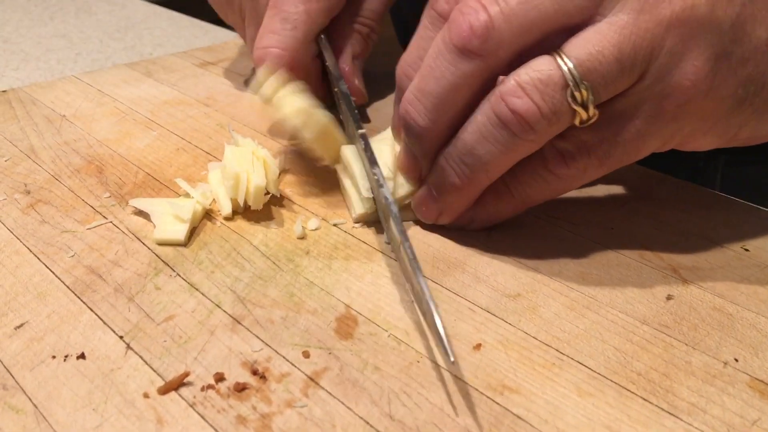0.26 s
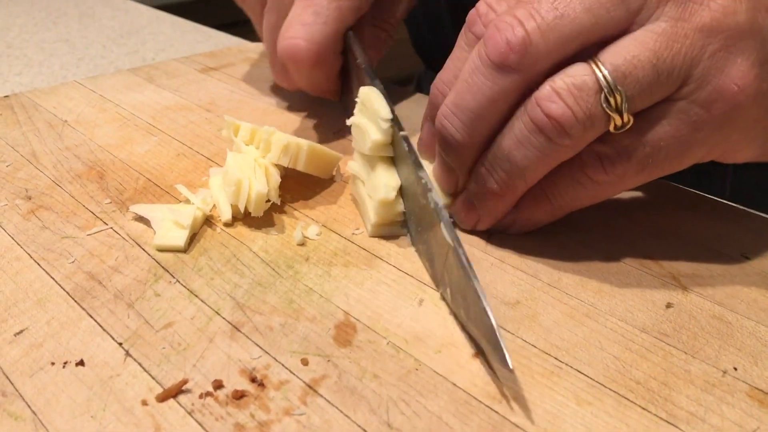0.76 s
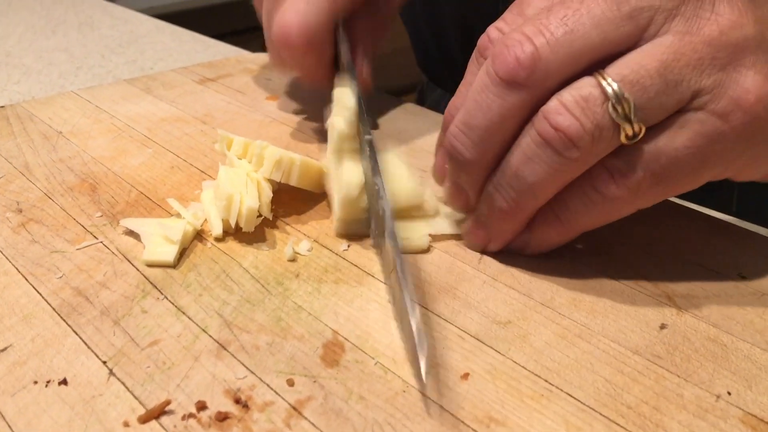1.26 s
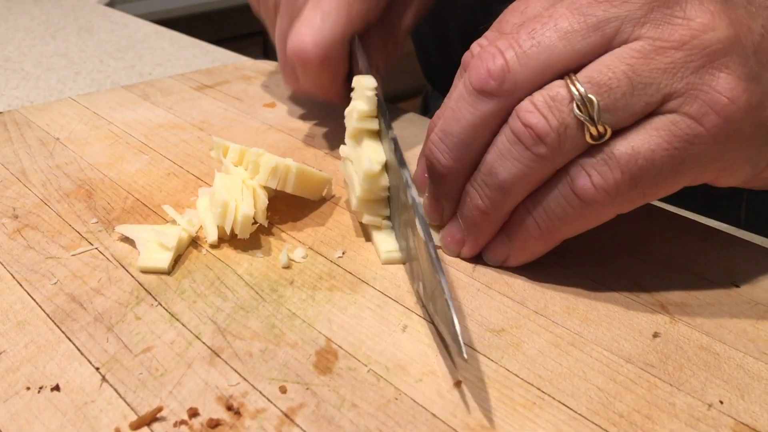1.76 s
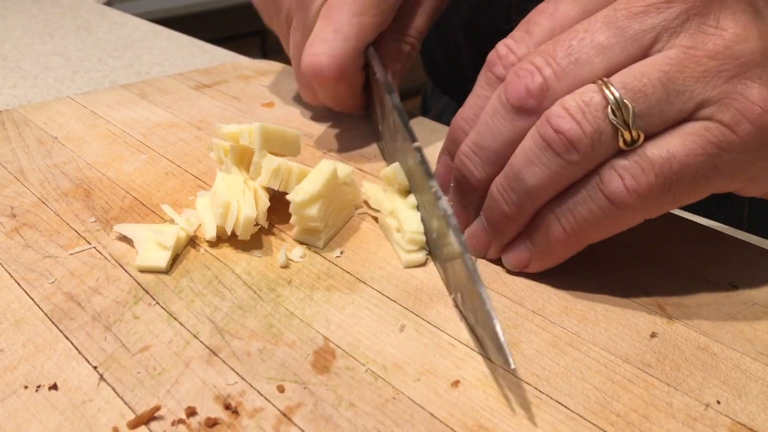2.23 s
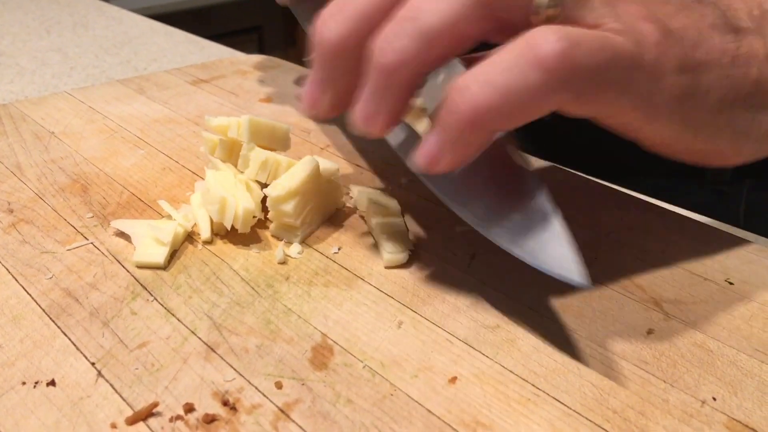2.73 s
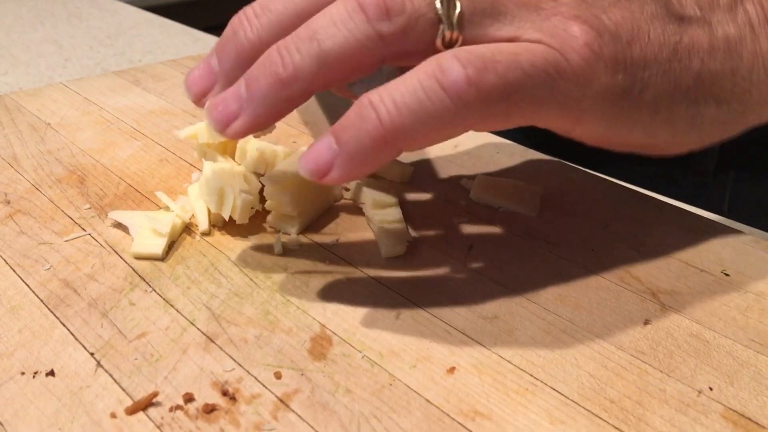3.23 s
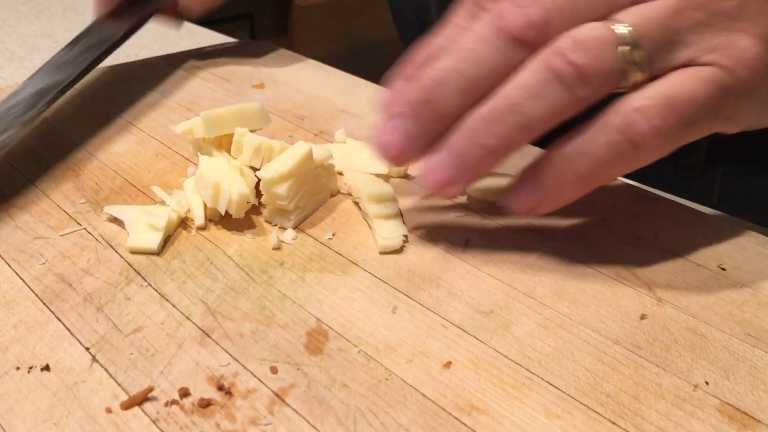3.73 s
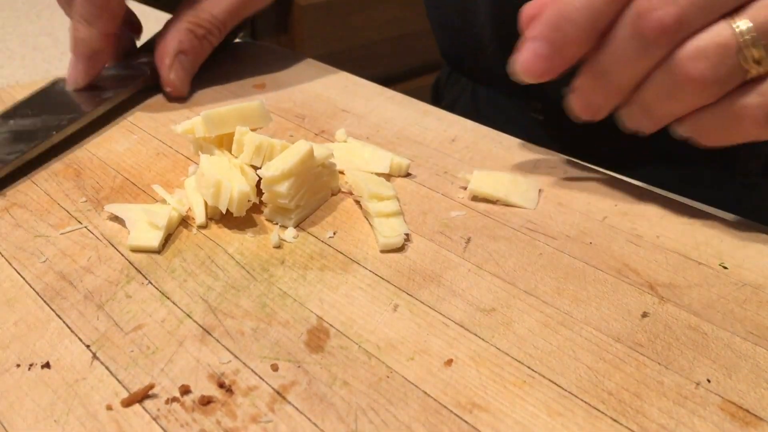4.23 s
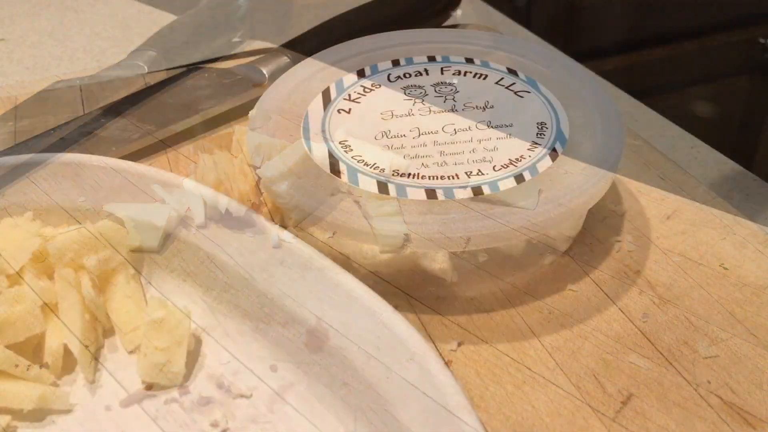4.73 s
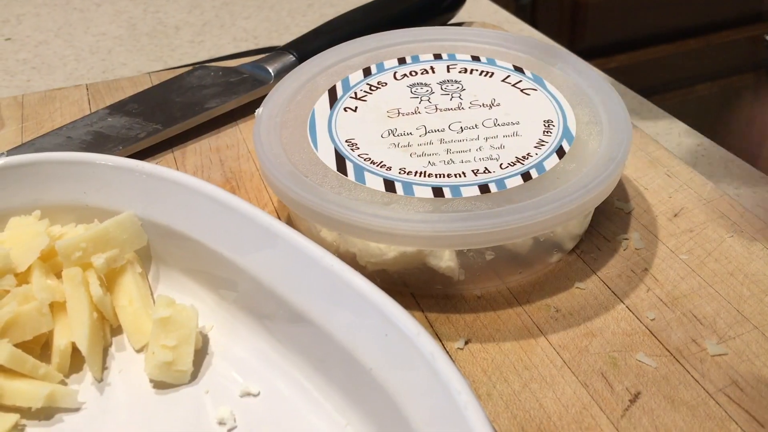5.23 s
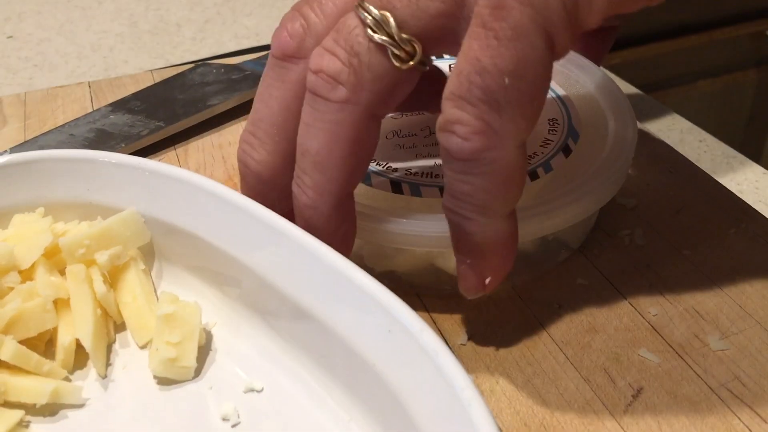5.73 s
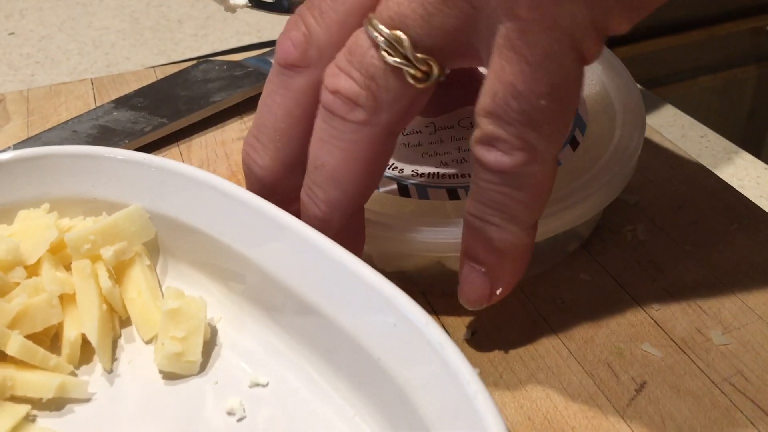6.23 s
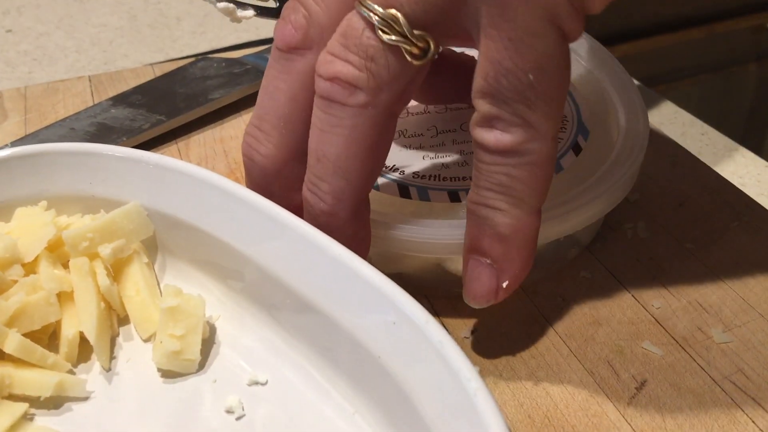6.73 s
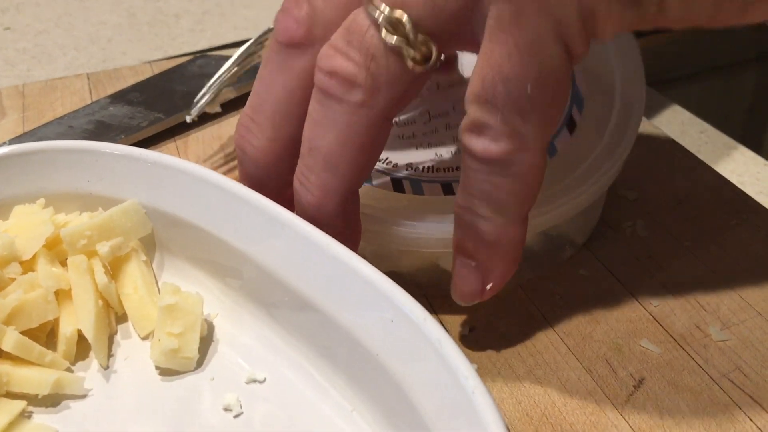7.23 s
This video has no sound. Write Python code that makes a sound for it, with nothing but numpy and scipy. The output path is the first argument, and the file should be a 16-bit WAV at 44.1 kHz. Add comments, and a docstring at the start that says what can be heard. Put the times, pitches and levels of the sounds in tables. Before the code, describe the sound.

Dull and hard chops land on a thick wooden board, with low thuds through the counter. Light finger strokes make the steel whisper and sing, then it brushes other cutlery and clatters down loudly. Quiet room air follows, then thin plastic taps, rim creaks, one bright snap and a final cluster of lid cracks. Near microphone, short kitchen reverberation, the loudest blows slightly overloaded.

```python
"""A knife chops firm cheese on a wooden board: struck slab modes, edge cracks and lumpy noise tails.
Steel ticks ring blade and cutlery modes; the blade is wiped clean by hissing strokes that make it sing,
then dropped on the counter, with the same knocks and low thuds. A hand grips a plastic tub and cracks
its lid open: snaps, creaks and grainy rubs of thin plastic. Sliding hisses softly; a small kitchen answers
with a sparse-tap tail over filtered-noise room air and a low appliance rumble."""
import sys
import numpy as np
from scipy import signal
from scipy.fft import rfft, irfft
from scipy.io import wavfile
from scipy.ndimage import uniform_filter1d

SR = 44100
rng = np.random.default_rng(int(sys.argv[2]) if len(sys.argv) > 2 else 0)


def store_pcm(level_fs):
    """Save levels as 16-bit WAV."""
    pcm = np.round(np.clip(level_fs, -1, 1) * 32767).astype(np.int16)
    wavfile.write(sys.argv[1], SR, np.atleast_2d(pcm).T)


N = 329427

# blade modes: pitch_hz, level_db, t60_s when struck
BLADE_MODES = [(2050, -8, .04), (2750, -8, .04), (3560, -12, .04), (4400, -12, .03), (5120, -14, .03),
               (5800, -14, .03), (6450, -6, .05), (7560, -7, .06), (8700, -3, .1), (9930, 0, .09),
               (10300, -14, .05), (11300, -1, .08), (12700, -9, .03), (13000, -14, .08), (13800, -10, .03),
               (14400, -14, .06), (15300, -8, .05)]
# contact noise of steel: freq_hz, density_db_per_hz
STEEL_CONTACT = [(500, -12), (1500, 2), (4000, -8.5), (8000, -9), (12000, -13), (15500, -23),
                 (17000, -35.5)]


def amp(db):
    """Amplitude ratio of a level in dB."""
    return 10 ** (np.asarray(db) / 20)


def evened(x):
    """Scale to rms 1."""
    return x / np.sqrt(np.mean(x ** 2) + 1e-20)


def read(points, hz):
    """Interpolate a (frequency, value) curve over log frequency."""
    f, value = np.transpose(points)
    return np.interp(np.log(hz + 1), np.log(f + 1), value)


def add(mix, start_s, sound):
    """Add a sound into the mix in place, cut at the end."""
    part = mix[round(start_s * SR):][:len(sound)]
    part += sound[:len(part)]


def coloured(spectrum, size, tilt_db_per_octave=0):
    """Noise of rms 1 with the given spectrum, tilted about 1 kHz."""
    hz = np.fft.rfftfreq(size, 1 / SR)
    db = read(spectrum, hz) + tilt_db_per_octave * np.log2((hz + 1) / 1000)
    return evened(irfft(rfft(rng.standard_normal(size)) * amp(db), size))


def ring(modes, contact_ms, tilt_db_per_octave=0, soft_ms=.1, size=12288):
    """One blow, peak 1: modes struck with chance strengths by a short uneven contact force."""
    tilt_limit = 8  # dB per octave
    hz, db, t60_s = np.transpose(modes)[:, :, None]
    t = np.arange(size) / SR
    db = db + 2.5 * rng.standard_normal(hz.shape)  # the struck spot favours some modes
    db = db + np.clip(tilt_db_per_octave, -tilt_limit, tilt_limit) * np.log2(hz / 1000)
    partials = amp(db - 60 * t / t60_s) * np.sin(2 * np.pi * hz * t)
    body = partials.sum(0)

    force = rng.standard_normal(2048) * np.exp(-t[:2048] * 1000 / max(contact_ms, .05))
    force *= rng.random(2048) < .08  # the contact breaks into a few micro-impacts
    force[0] = 2.2
    pad = np.hanning(int(np.clip(soft_ms, .05, 40) * SR / 1000) + 3)  # a yielding surface rounds the force
    blow = signal.fftconvolve(body, np.convolve(force, pad))[:size]
    return blow / abs(blow).max()


def crack(spectrum, decay_ms, tilt_db_per_octave=0, rise_ms=.4, size=4096):
    """A burst of noise that dies away, peak 1."""
    t_ms = np.arange(size) * 1000 / SR
    envelope = np.exp(-t_ms / max(decay_ms, .2)) * np.minimum(t_ms / rise_ms, 1)
    burst = coloured(spectrum, size, tilt_db_per_octave) * envelope
    return burst / abs(burst).max()


def resonate(x, hz, width_hz):
    """A two-pole resonance of gain about 1."""
    return signal.lfilter(*signal.iirpeak(hz, hz / width_hz, SR), x)


def strokes(rows, rise_s, fall_s):
    """Gain of strokes that swell, hold or drift to an end level, and stop half a fall past their length."""
    t = np.arange(N) / SR
    gain = np.zeros(N)
    for start_s, length_s, *db in rows:
        end_s = start_s + length_s
        level = amp(np.interp(t, [start_s, end_s], [db[0], db[-1]]))
        ramp = np.minimum((t - start_s) / rise_s, (end_s - t) / fall_s + .5)
        gain += level * np.clip(ramp, 0, 1) ** 2
    return gain


def kitchen_air():
    """Coloured room noise with fuzzy rumble bands from an appliance: noise through doubled resonances."""
    # rumble bands: pitch_hz, width_hz of each of two passes, level_db
    hums = [(51.8, 7.4, -50), (214, 90, -58), (328, 6.1, -56)]
    # room noise: freq_hz, density_db_per_hz
    air_spectrum = [(13, -40), (30, -16), (50, 0), (70, -7), (119, -12), (186, -4), (259, -15), (332, -6),
                    (463, -23), (1700, -32), (2650, -37), (3700, -38), (15200, -48), (16500, -62)]
    air_db = -49
    out = amp(air_db) * coloured(air_spectrum, N)
    for hz, width_hz, db in hums:
        once = resonate(rng.standard_normal(N), hz, width_hz)
        out += amp(db) * evened(resonate(once, hz, width_hz))
    return out


def thuds():
    """Slow pushes and blows swing the counter's lowest modes."""
    # pushes: start_s, peak_db, push_ms
    pushes = [(0.05, -21, 4.4), (0.191, -30, 6.8), (0.271, -20.5, 1.7), (0.381, -29.5, 4.6),
              (0.693, -20, 9.8), (0.731, -23, 3.9), (0.831, -22.5, 4.8), (1.346, -17.5, 18),
              (1.791, -24, 6.4), (1.859, -17.5, 6.8), (1.917, -20, 9.5), (2.247, -11.5, 3.4),
              (2.289, -17, 4.4), (3.878, -24.5, 2.1), (3.924, -8, 2), (3.975, -13, 6.9), (4.234, -8, 20),
              (4.3, -12.5, 9.9), (4.359, -19, 11), (4.431, -23.5, 16), (4.548, -36, 3.6), (5.7, -19, 0.73),
              (7.119, -19, 7), (7.341, -17.5, 3.9)]
    # counter modes: pitch_hz, level_db, t60_s
    counter_modes = [(53.6, 1.5, 0.17), (78, 0, 0.031), (107, -3, 0.19), (148.86, -5, 0.2),
                     (203, 3.5, 0.063), (253, -10, .15), (340, -22.5, .15)]
    out = np.zeros(N)
    for start_s, db, push_ms in pushes:
        add(out, start_s, amp(db) * ring(counter_modes, 1.8, soft_ms=push_ms, size=16384))
    return out


def knocks():
    """Steel on wood: chops on the board, then the knife dropped on the counter; hard blows reach higher."""
    # knocks: start_s, peak_db, treble_crack_db, hardness_0_to_1, brightness_db_per_octave
    blows = [(0.067, -35.5, -55, .3, -10), (0.266, -5.5, -14.5, 0.15, -8.5), (0.709, -43.5, -73, .5, -10),
             (0.829, 1, -9.5, 0, -2.5), (1.086, -32, -35, .3, -6.5), (1.32, -31, -60, .5, 10.5),
             (1.342, 10.5, -4.5, .6, 10), (1.801, -35.5, -63, .2, -5), (1.868, -1, -31.5, 0, -5.5),
             (2.243, -30, -47, .4, -5), (2.287, -0.5, -50.5, 0, -7.5), (3.22, -35.5, -64.5, .06, -1),
             (3.256, -43.5, -72, .3, -11), (3.928, -17.5, -60, .3, -10.5), (4.212, -25.5, -31.5, .3, 1.5),
             (4.235, 14.5, 4, .3, 5), (4.248, 8, -21, .9, -9.5), (4.297, -4, -9, .2, -8.5),
             (4.358, -12.5, -14.5, .3, -20.5), (4.399, -13.5, -18.5, 0, -15.5)]
    # wood modes: pitch_hz, level_db, t60_s
    wood_modes = [(282, -9.5, .08), (707, -8, .022), (819, -10, .025), (1134, -4, 0.011), (1066, -14, .03),
                  (1154, -9, .02), (1312, -2.5, .015), (1475, -10, .03), (1750, -8.5, .025),
                  (1880, -11, .025), (2159, -30, .03)]
    # dense small modes of the slab: freq_hz, density_db_per_hz
    wood_spectrum = [(180, -33), (300, -2), (434, -2.5), (577, -12.5), (991, -5), (1180, -8), (1590, -2),
                     (1880, -30), (2570, -21.5), (9000, -48.5), (11700, -76), (19800, -120)]
    # tail of a bare hard blow: freq_hz, density_db_per_hz
    hard_spectrum = [(300, -7), (545, -21), (1060, 0.5), (1380, -6), (1700, -5.5), (2300, -17.5),
                     (2600, -8.5), (2850, -34.5), (4200, -28.5), (4480, -19.5), (4800, -47), (9000, -44.5),
                     (16000, -71.5)]
    band_low_hz, soft_band_high_hz = 520, 1800  # where the slab radiates best
    contact_ms, crack_ms, crack_tilt_db_per_octave = 1, 1.2, -5
    lead_db, lead_ms = -30.5, 3  # relative to the knock
    wood_t60_s, hard_t60_s = 0.1, 0.23
    wood_tail_db, hard_tail_db = -23, -14.5  # relative to the knock: cushioned, bare
    lump_db = 1.5  # rms
    tail_size = 12288

    out = np.zeros(N)
    for start_s, db, crack_db, hard, tilt in blows:
        hard = np.clip(hard, 0, 1)
        edges_hz = [band_low_hz, soft_band_high_hz * (1 + 2.4 * hard)]
        band = signal.butter(3, edges_hz, "band", fs=SR, output="sos")
        blow = ring(wood_modes, contact_ms, tilt, soft_ms=0.21, size=4096)
        knock = signal.sosfilt(band, blow) + 0.2 * blow  # swells over a cycle or two
        # a short rasp swells just before each knock
        lead = crack(hard_spectrum, lead_ms, size=2048)[::-1]
        add(out, start_s - len(lead) / SR, amp(db + lead_db) * lead)
        add(out, start_s, amp(db) * knock / abs(knock).max())
        edge_crack = crack(STEEL_CONTACT, crack_ms, crack_tilt_db_per_octave)
        add(out, start_s, amp(crack_db) * edge_crack)

        slow_noise = uniform_filter1d(rng.standard_normal(tail_size), size=220)
        lumps = amp(lump_db * evened(slow_noise))
        tails = ((1 - hard, wood_spectrum, wood_t60_s, wood_tail_db),
                 (hard, hard_spectrum, hard_t60_s, hard_tail_db))
        for share, spectrum, t60_s, tail_db in tails:
            tail = crack(spectrum, 1000 * t60_s / np.log(1000), rise_ms=9.8, size=tail_size)
            add(out, start_s, share * amp(db + tail_db) * lumps * tail)
    return out


def scuff():
    """Faint broad hiss of knife and hands dragging over board, cheese and lid: coloured noise."""
    # drags: start_s, length_s, start_db, end_db
    drags = [(.3, 0.14, -65, -62), (.84, 0.32, -65, -76), (1.36, 0.39, -60, -56.5), (2.3, 0.56, -81, -64),
             (3.6, 0.44, -68, -74), (4.03, 0.45, -57.5, -51.5), (4.38, 0.39, -51.5, -59.5),
             (5.64, 0.57, -63.5, -63.5), (6.87, 0.23, -61, -59)]
    # sliding hiss: freq_hz, density_db_per_hz
    drag_spectrum = [(410, -29), (700, -7.5), (1040, 1.5), (1220, -2.5), (1510, -3), (13900, -13.5),
                     (15900, -22.5), (16500, -36.5)]
    return coloured(drag_spectrum, N) * strokes(drags, rise_s=.08, fall_s=.04)


def steel_hits(hits, modes, contact_ms_at_0_db):
    """Steel on a hard top: a crack, then thin metal modes; fainter contacts are briefer."""
    shorter_db_per_db = 0.04
    out = np.zeros(N)
    for start_s, db, ring_db, tilt in hits:
        ms = contact_ms_at_0_db * amp(shorter_db_per_db * db)
        add(out, start_s, amp(db) * crack(STEEL_CONTACT, ms, tilt))
        add(out, start_s, amp(ring_db) * ring(modes, ms, tilt))
    return out


def blade_ticks():
    """The blade ticks and rattles on board and counter, ringing its own modes."""
    # ticks: start_s, peak_db, ring_peak_db, brightness_db_per_octave
    tick_hits = [(0.9585, -44, -60, -4), (2.011, -41, -58, -2.5), (2.219, -38, -60.5, -9),
                 (2.225, -43, -66, 1.5), (2.232, -47.5, -61.5, 3), (2.4176, -30.5, -39.5, -4),
                 (2.5485, -48, -75.5, -1.5), (3.8779, -16, -25, -2.5), (4.2534, -7.5, -24, 3.5),
                 (4.2961, -3.4, -20, 10), (4.3264, -13, -28, 10), (4.3549, -15, -32, 6),
                 (4.38, -8.5, -10, 12), (4.3957, -10.5, -18, 6), (4.4066, -15.5, -24, 0.3),
                 (4.4244, -22, -39, -7)]
    return steel_hits(tick_hits, BLADE_MODES, contact_ms_at_0_db=6.4)


def wipe():
    """Finger friction along the blade hisses in fine jerks and sets the blade modes singing."""
    # finger strokes: start_s, length_s, hiss_db, ring_db
    finger_strokes = [(2.314, 0.097, -62, -62), (2.393, 0.028, -44, -64), (2.724, 0.093, -59, -67.5),
                      (2.839, 0.1, -57.5, -63), (2.998, 0.093, -69, -62.5), (3.166, 0.087, -61, -66),
                      (3.244, 0.15, -68, -62.5), (3.416, 0.12, -57, -54.5), (3.687, 0.11, -69, -69)]
    # skin friction: freq_hz, density_db_per_hz
    skin_spectrum = [(1000, -41), (3000, 0), (5000, -1.5), (7000, 3), (11000, -1), (15500, 0.5),
                     (17000, -18)]
    rise_s, fall_s = 0.024, .045
    rows = np.array(finger_strokes)
    hiss_gain = strokes(rows[:, [0, 1, 2]], rise_s, fall_s)
    song_gain = strokes(rows[:, [0, 1, 3]], rise_s, fall_s)
    jerks = amp(2.8 * evened(uniform_filter1d(rng.standard_normal(N), 260)))
    hiss = evened(jerks * coloured(skin_spectrum, N)) * hiss_gain
    white = evened(jerks * rng.standard_normal(N))

    def sing(x):
        """Drive the blade modes, ringing a little longer than when struck."""
        return sum(amp(db) * resonate(x, hz, 1.8 / t60_s) / np.sqrt(2.2 / t60_s)
                   for hz, db, t60_s in BLADE_MODES)

    return hiss + sing(white * song_gain) / np.std(sing(white))


def cutlery_nudges():
    """The knife nudges other cutlery, ringing its long thin modes."""
    # nudges: start_s, peak_db, ring_peak_db, brightness_db_per_octave
    nudge_hits = [(3.9722, -10, -20, 0), (3.995, -29.5, -30, -4.5), (4.0104, -35, -32, -5),
                  (4.027, -23, -27, -2), (4.0391, -22, -38, -2.2)]
    # cutlery modes: pitch_hz, level_db, t60_s
    cutlery_modes = [(1700, -4, .08), (1950, -2, .16), (2080, -6, .1), (2700, -7, .07), (3316, -9, .12),
                     (3758, -10, .07), (4300, -8, .1), (5329, -13, .2), (5717, -13, .2), (6740, -13, .25),
                     (7101, -14, .5), (7125, -15, .5), (8904, -9, .15), (9340, -8, .25), (10560, -13, .6),
                     (10590, -14, .6), (11830, -13, .6), (13160, -13, .5), (14130, -13, .4),
                     (14760, -12, .4)]
    return steel_hits(nudge_hits, cutlery_modes, contact_ms_at_0_db=2.4)


def plastic(hits, rubs, modes, tilt_at_0_db, tilt_per_db=0):
    """Thin plastic: dull short modes, bright snaps and a grainy rub; too small to radiate bass."""
    # snap noise: freq_hz, density_db_per_hz
    snap_spectrum = [(1180, 7.5), (2000, -3.5), (3460, -4), (4590, -1), (6360, -8.5), (9630, -14),
                     (10400, -16.5), (13100, -12.5), (16500, -35)]
    snap_decay_per_contact = 2.57
    out = np.zeros(N)
    for start_s, db, snap_db, contact_ms in hits:
        blow = ring(modes, contact_ms, tilt_at_0_db + tilt_per_db * db, soft_ms=0.2, size=3072)
        add(out, start_s, amp(db) * blow)
        add(out, start_s, amp(snap_db) * crack(snap_spectrum, snap_decay_per_contact * contact_ms))
    grains = rng.random(N) < .1
    grit = rng.standard_normal(N) * amp(2.0 * rng.exponential(1, N)) * grains
    # rubbed modes ring twice as long as struck ones
    shell = evened(sum(amp(db) * resonate(grit, hz, 1.1 / t60_s) for hz, db, t60_s in modes))
    out += shell * strokes(rubs, rise_s=0.017, fall_s=0.047)
    return signal.sosfilt(signal.butter(3, 450, "high", fs=SR, output="sos"), out)


def tub_lid():
    """The lid is gripped, rubbed and snaps open; stronger snaps are brighter."""
    # snaps: start_s, peak_db, treble_snap_db, contact_ms
    lid_snaps = [(5.671, -31.5, -36, 11), (5.7, -10.5, -24, 1.7), (5.758, -24.5, -57, 1.6),
                 (5.801, -30.5, -47, 5.4), (5.868, -35, -46, 1.6), (6.66, -58.5, -42.5, 1.9),
                 (6.786, -44, -60, 1.9), (6.862, -3.5, -3, 0.74), (7.046, -24.5, -28, 1.6),
                 (7.08, -19.5, -41, 4.4), (7.093, -19, -3, 1.24), (7.103, -9, -15.5, 1.6),
                 (7.109, -9, -4.5, 1.5), (7.228, -13.5, -32, 4.6), (7.242, -10.5, -43, 2.9),
                 (7.258, -20, -30, 2.9), (7.294, -17.5, -37, 5), (7.311, -20, -11.5, 0.85),
                 (7.323, -7.5, -14, 2.15), (7.338, -24, 1, 2.6), (7.344, 0, -19, 2),
                 (7.356, -33, -2.5, 0.8), (7.374, -28, -35, 1), (7.385, -25, -40, 0.8)]
    # finger rubs: start_s, length_s, level_db
    lid_rubs = [(5.633, .24, -55), (7.031, 0.075, -42), (7.208, 0.072, -34.5), (7.279, 0.13, -31.5)]
    # lid modes: pitch_hz, level_db, t60_s when struck
    lid_modes = [(480, -19, .02), (580, -11, .025), (720, -5, .03), (850, -3, .025), (1000, 0, .03),
                 (1150, -2, .025), (1330, -2, .03), (1550, -8, .02), (1830, -10, .03), (2100, -11, .02),
                 (2500, -16, .02)]
    return plastic(lid_snaps, lid_rubs, lid_modes, tilt_at_0_db=9.5, tilt_per_db=1.4)


def tub_rim():
    """The rim creaks under the twisting hand, on its own modes."""
    # creaks: start_s, peak_db, treble_snap_db, contact_ms
    rim_creaks = [(6.178, -41, -57, 2.3), (6.219, -26, -42.5, 6.4), (6.23, -40, -57, 2.5),
                  (6.258, -26, -46, 3.9), (6.31, -26.5, -38, 1.7), (6.336, -27.5, -35.5, 1.1),
                  (6.37, -31, -55, 1.4), (6.405, -27, -38, 3.7), (6.424, -32.5, -39.5, 1.8),
                  (6.434, -27, -51, 3.2), (6.458, -38, -63, 2.5), (6.509, -34, -66, 2)]
    # hand twists: start_s, length_s, level_db
    rim_twists = [(6.195, 0.346, -57.5)]
    # rim modes: pitch_hz, level_db, t60_s when struck
    rim_modes = [(620, -3, .035), (720, 0, .04), (1000, -7, .015), (1350, -8, .02), (1780, -8, .025),
                 (1880, -11, .02), (2500, -18, .02), (4300, -26, .015)]
    return plastic(rim_creaks, rim_twists, rim_modes, tilt_at_0_db=-2)


def room(x):
    """Reverberation: sparse taps of random sign, each band dying at its own speed."""
    # decay: freq_hz, t60_s
    room_decay = [(100, 1), (500, 0.36), (1200, 0.29), (3000, 0.26), (8000, 0.25), (16000, 0.19)]
    taps = np.zeros(SR)
    at = np.arange(150, SR - 20, 20)
    taps[at + rng.integers(0, 20, len(at))] = rng.choice([-1., 1.], len(at))
    hz, t, bands = signal.stft(taps, SR, nperseg=256)
    decay = amp(-60 * t / read(room_decay, hz)[:, None])
    tail = signal.istft(bands * decay, SR, nperseg=256)[1]
    return signal.fftconvolve(x, tail / np.linalg.norm(tail))[:N]


def scene():
    """Near sources and their room tail, over scuffs, counter thuds and kitchen air."""
    room_db = -14
    near = knocks() + blade_ticks() + wipe() + cutlery_nudges() + tub_lid() + tub_rim()
    return (near + amp(room_db) * room(near) + scuff() + thuds() + kitchen_air())[None]


def record(dry):
    """The microphone drops the deepest bass, the loudest blows overload the input; then the band limit."""
    mic_low_hz, edge_hz = 40, 16500
    sensed = signal.sosfilt(signal.butter(8, mic_low_hz, "high", fs=SR, output="sos"), dry)
    clipped = np.clip(sensed, -.97, .97)
    lowpass = signal.firwin(255, edge_hz, window=("kaiser", 9), fs=SR)
    return signal.oaconvolve(clipped, lowpass[None], "same")


dry = scene()
out = record(dry)
store_pcm(out)
```